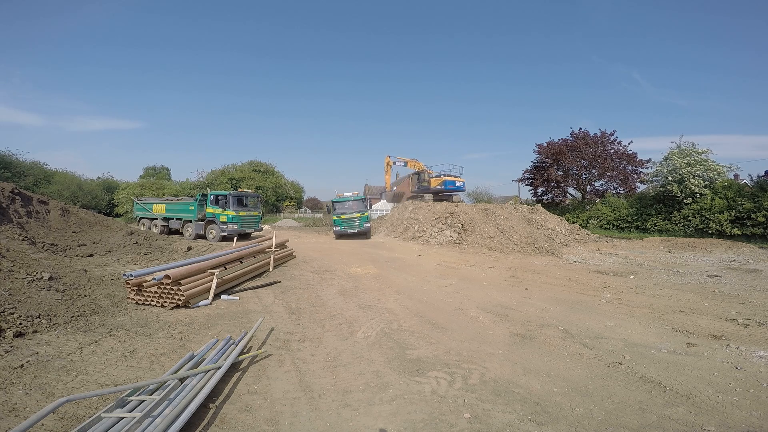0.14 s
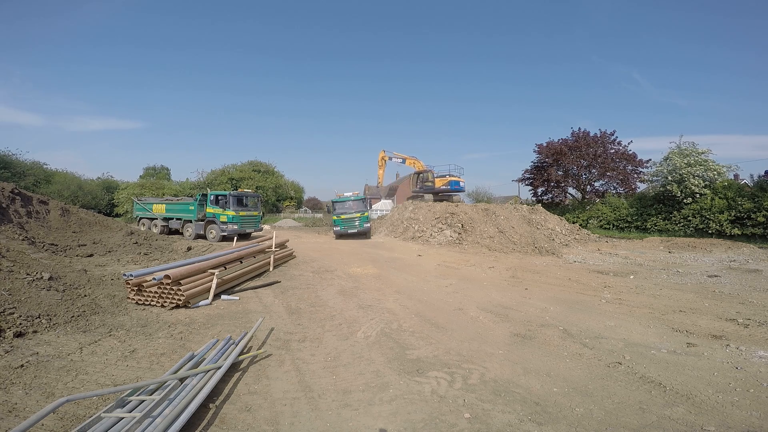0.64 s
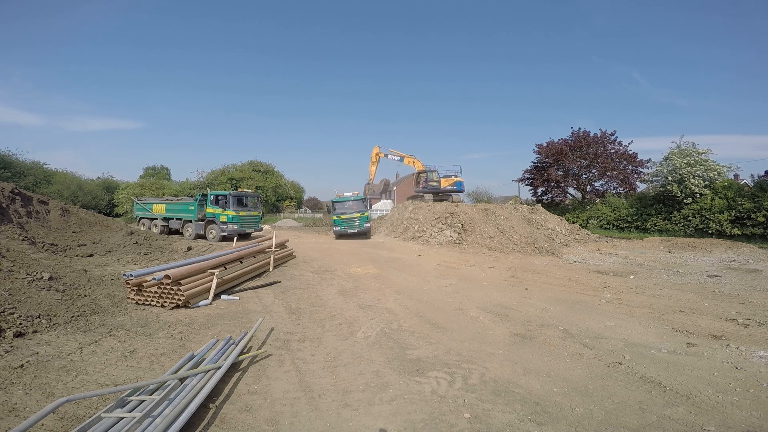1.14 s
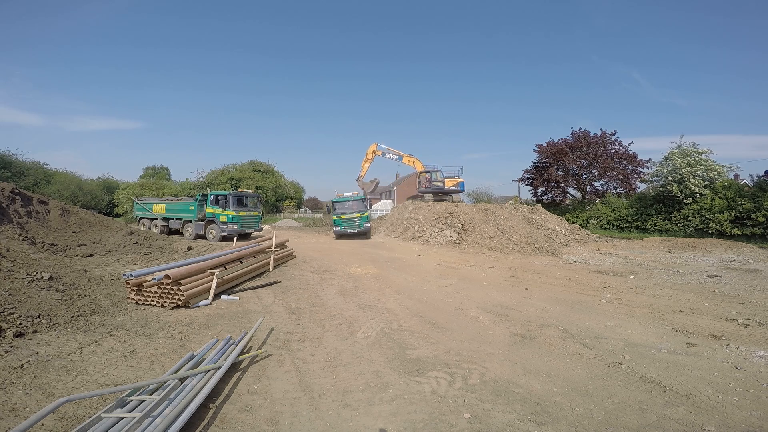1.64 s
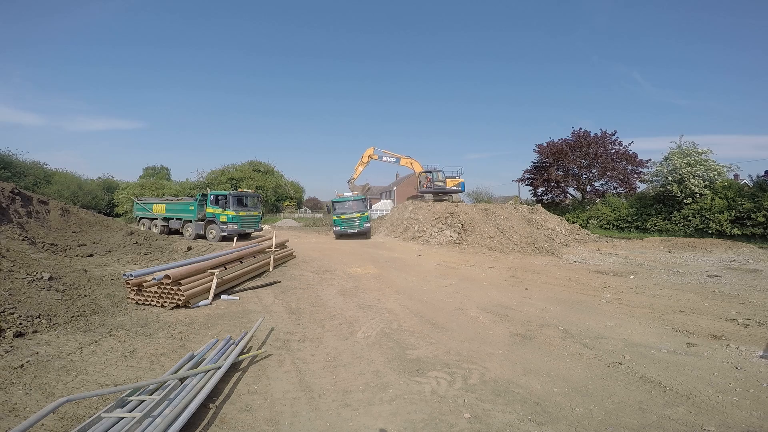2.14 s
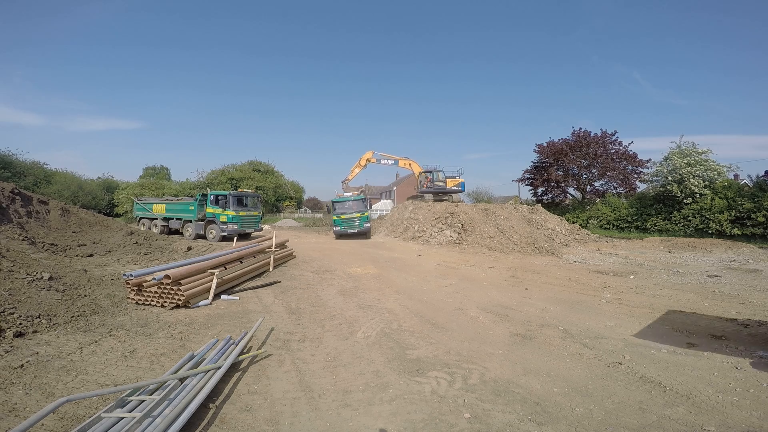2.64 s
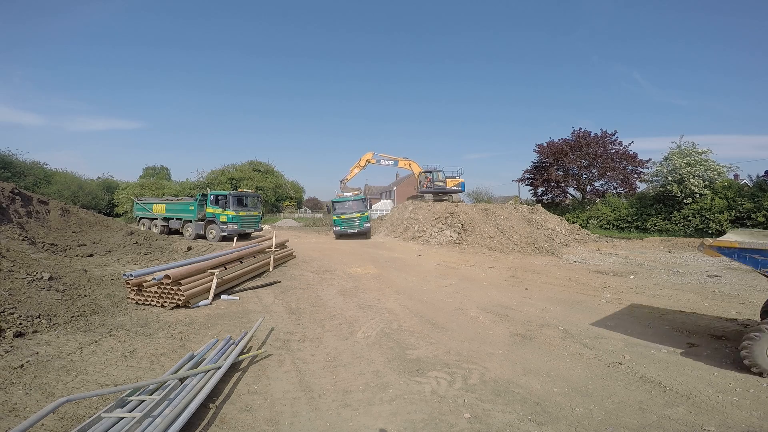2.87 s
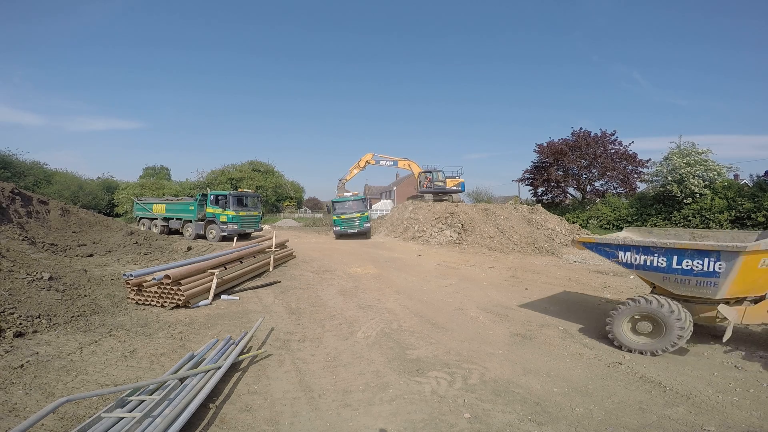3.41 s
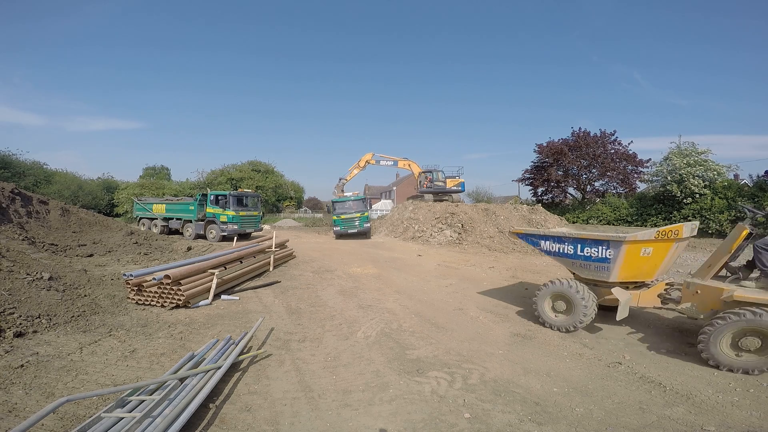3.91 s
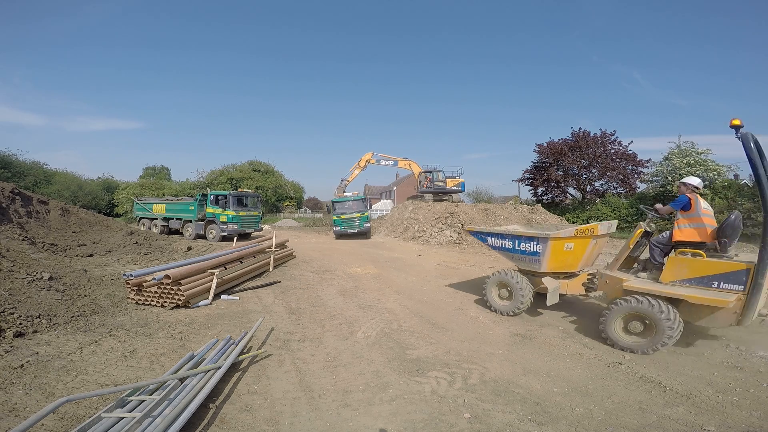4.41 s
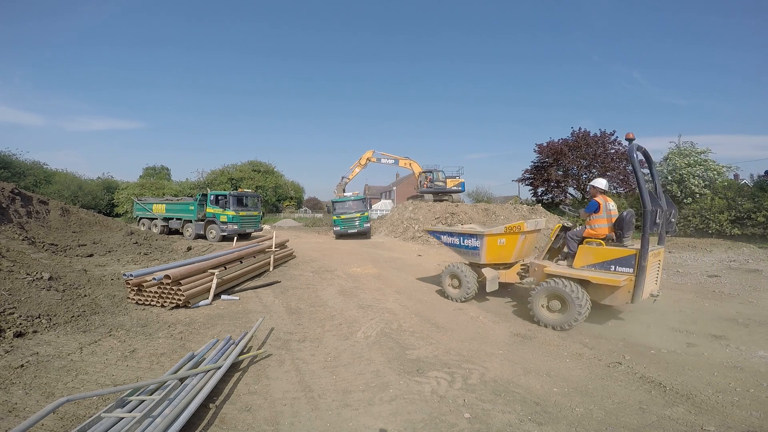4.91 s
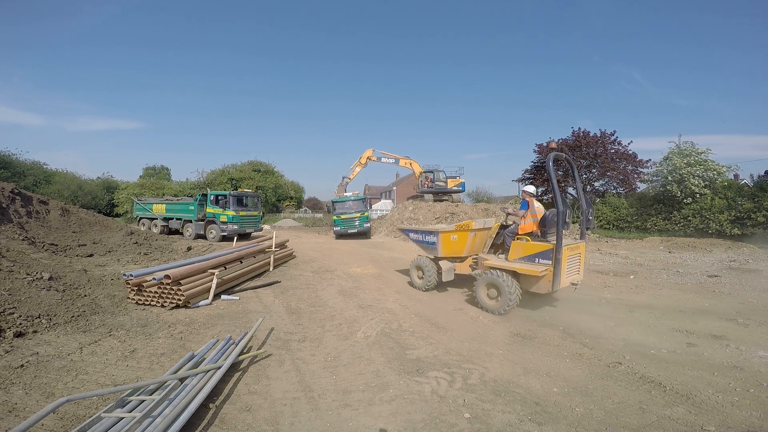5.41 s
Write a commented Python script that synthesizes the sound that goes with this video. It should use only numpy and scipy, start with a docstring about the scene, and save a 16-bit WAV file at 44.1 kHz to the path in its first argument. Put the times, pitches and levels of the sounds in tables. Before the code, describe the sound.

Close diesel engine hums and roars on an earthworks site, skip rattling over ruts, then knocks harder in short throttle bursts as it drives off.

```python
"""An earthworks site: a small diesel dumper drives past a camera microphone in a closed housing.
Close by, two exhaust tones follow the firing rate and noise roars, breaking into diesel knock under load.
The skip clanks over ruts as short noise rattles that ring its modes; thin hiss bands flutter as squeaks.
Far off, coloured noise, unsteady low tones and a sagging sine make a wash, idling machines and a pump.
The housing colours it all with fixed resonances and adds thin electrical tones."""
import sys
import numpy as np
from scipy import signal
from scipy.fft import rfft, irfft, next_fast_len
from scipy.io import wavfile
from scipy.ndimage import uniform_filter1d

SR = 44100
rng = np.random.default_rng(int(sys.argv[2]) if len(sys.argv) > 2 else 0)


def gain_from_db(level_db):
    """Convert decibel levels to linear amplitude factors (20 dB per decade)."""
    decades = np.asarray(level_db, float) / 20
    return 10 ** decades


def waveform_to_disk(signal):
    """Save audio, clipped to [-1, 1], as 16-bit WAV at the path in sys.argv[1]."""
    frames = np.transpose(np.atleast_2d(signal))
    scaled = np.clip(frames, -1, 1) * 32767
    samples = np.round(scaled).astype(np.int16)
    wavfile.write(sys.argv[1], SR, samples)


N = 243873

# engine speed: time_s, firing_rate_hz
SPEED = [(0.0, 74), (0.08, 73.26), (0.55, 72.7), (0.71, 68.42), (1.79, 67.4), (2.15, 59.08), (2.51, 65.56),
         (2.66, 63.5), (2.79, 58.9), (3.2, 59.5), (3.42, 55.11), (3.88, 48.71), (4.07, 44.56), (4.3, 50.46),
         (4.5, 52.45), (4.79, 52.9), (4.91, 50.9), (5.53, 52.6)]
# the drive past: time_s, coasting_tone_db, roar_db (before its trim and surges),
# steady_load (0-1, share of the roar that comes as knocks), tilt_db_per_octave
DRIVE_PAST = [(0, -37.5, -54, 0.02, 0), (.5, -38, -52.5, 0.03, 0), (1.2, -41, -54.5, 0.06, -2),
              (1.6, -36.5, -52, 0.03, -1.5), (2, -35.5, -53, 0, -0.5), (2.34, -33, -51, 0.26, -3.5),
              (3.1, -31.5, -53, 0.03, -2), (3.4, -36, -54, 0.45, -3), (4.05, -36.5, -53.5, 0.29, -2.5),
              (4.4, -34.5, -49.5, .35, -2), (5, -34, -52, 0.23, -.5), (5.53, -33.5, -50.5, 0.19, -1.5)]
# the throttle opens: start_s, length_s, octave_start_db, octave_end_db, firing_tone_sink_db
PULLS = [(-.1, 0.64, -50, -48.5, 11.5), (0.64, 1.11, -50.5, -47.5, 8), (2.118, 0.064, -48, -48, 4),
         (2.28, 0.37, -47.5, -43.5, 9), (2.75, .12, -48, -49, 4.5), (2.94, 0.3, -59.5, -37, 3.5),
         (4.0, 0.31, -40.5, -33.5, 3.5), (4.328, .19, -38, -36.5, 8.5), (4.599, 0.21, -41.5, -37, 9),
         (4.945, 0.091, -42, -46, 9), (5.118, 0.47, -41.5, -37, 5.5)]
# the firing tone swells or drops out briefly: centre_s, half_width_s, change_db
WOBBLES = [(2.17, .03, 3), (2.23, 0.026, -20), (3.0, 0.03, -0.5), (3.18, 0.026, 7.5), (3.22, 0.02, -22),
           (3.94, 0.039, 7.5), (4.03, 0.056, -4.5), (5.28, 0.034, -8)]
# the wheels dig in: centre_s, half_width_s, added_load (0-1), added_cover_buzz_db
SURGES = [(3.75, 0.17, 0, -3), (4.27, 0.092, 0.38, -0.5), (4.5, 0.046, 0.23, 2), (4.77, 0.055, 0.21, 6),
          (5.26, 0.043, 0.32, 6.5), (5.43, 0.14, 0.25, 2.5), (5.53, .05, 0.02, 0)]
# weak upper tones locked to the firing rate (exhaust orders, and a gear or fan line at 4.2):
# multiple_of_firing_rate, level_db (over the rasp)
UPPER_ORDERS = [(3, 1), (4, -5), (4.2, -4.5), (5, -14), (6, -5.5), (7, -7)]
# some clear firings: time_s
KNOCK_TIMES = [4.246, 4.52, 4.771, 4.934, 5.244, 5.415, 5.512]
# tone colour of the roar: frequency_hz, level_db
ROAR_COLOUR = [(300, -0.5), (800, -2.5), (1500, -3), (2500, -3.5), (4000, -5), (7000, -12.5),
               (10000, -21.5), (15500, -25)]
# engine block rings under full load: centre_hz, width_hz, gain_db
BLOCK = [(5620, 580, 17), (7290, 480, 16)]
# engine cover buzz: centre_hz, width_hz, share (of the buzz in dB)
COVER = [(1800, 182, 1), (2250, 280, 1)]
# skip and chassis clanks: start_s, level_db (before trim), rattle_length_s, centre_hz, skip_ring_db
CLANKS = [(1.585, -20.5, 0.011, 1400, -18), (2.144, -21.5, 0.037, 2550, -2.5),
          (2.176, -26, 0.078, 1800, -11), (2.237, -18.5, 0.047, 2250, -9.5), (2.255, -23, 0.014, 1000, 8.5),
          (2.383, -27.5, 0.022, 4770, -22), (2.416, -18.5, 0.022, 1380, -11), (2.438, -22, .014, 2480, -26),
          (2.477, -25, 0.026, 2420, -7), (2.591, -24, 0.054, 1380, -20), (2.735, -29, 0.024, 2500, -17),
          (2.83, -24.5, 0.057, 5040, -30), (2.855, -48, 0.0081, 4460, -18), (2.904, -23, 0.023, 1360, -24),
          (3.149, -28.5, 0.059, 2420, -31), (3.191, -28.5, 0.09, 1990, -4), (3.246, -28, 0.031, 5100, -16),
          (3.362, -33, 0.035, 5830, -27), (3.88, -27, 0.037, 4450, -8.5)]
# ringing modes of the skip: pitch_hz, level_db (relative), t60_s
SKIP = [(153, 9, 0.053), (203, 0, 0.056), (291, 0.5, 0.059), (328, -1.5, 0.085), (500, 3.5, 0.046),
        (710, -5, 0.041), (947, 3.5, 0.032)]
# thin high squeaks: start_s, length_s, pitch_hz, width_hz, level_db
SQUEAKS = [(-.1, 0.26, 8300, 600, -70), (0.14, 0.26, 8270, 600, -70), (0.19, .22, 9400, 600, -78),
           (1.58, 0.25, 2520, 50, -68.5), (0.495, 0.38, 8270, 600, -72), (3.44, .08, 11100, 600, -74),
           (3.6, 0.12, 11000, 500, -79), (4.62, .07, 11400, 400, -75), (4.97, 0.053, 8200, 300, -67)]
# colour of the distant wash: frequency_hz, level_db (per Hz, relative)
SITE_COLOUR = [(12, -32), (20, 13), (70, -4), (243, -18), (1220, -21), (1400, -18), (1560, -40.5),
               (2510, -33), (3600, -32), (4130, -31.5), (5930, -40), (12900, -43), (15200, -55)]
# far idling tones: pitch_hz, unsteadiness_hz, level_db (relative)
IDLING = [(36, 4, 0), (51, 5, -1), (92, 2, -11)]
# far idling swells or sags: centre_s, half_width_s, change_db
REVS = [(1.45, 0.33, 5.5), (2.4, 0.57, 8), (4.39, 0.22, -9), (4.97, .15, 10.5), (5.55, .1, 2)]
# the pump whine swells or fades: centre_s, half_width_s, change_db
WHINE_CHANGES = [(2, 0.32, -2.5), (3.0, 0.36, 3.5), (3.7, 0.25, -14), (4.2, 0.28, -5), (5.5, 0.87, -8)]
# resonances and notches of the housing: centre_hz, width_hz, gain_db
HOUSING = [(1077, 105, 4.5), (1216, 104, -6), (1412, 48, 6.5), (1603, 102, -13.5), (1693, 300, 4.5),
           (2080, 55, -15), (2470, 180, 8), (3446, 160, 4.5), (3567, 145, -17), (4135, 493, 12),
           (5390, 190, 4.5), (6270, 92, 3), (7300, 500, 0), (8160, 150, 2)]
# electrical tones: pitch_hz, level_db
ELECTRICAL = [(6293.7, -78), (6323.7, -75), (12617.4, -81)]

OPEN_S, SHUT_S = 0.07, 0.11  # throttle opening and closing ramps
SHUT_OCTAVE_DB = -21.5  # octave under the firing tone with the throttle shut
RASP_DB, RASP_LOAD_DB = -65.5, 14  # upper orders: level unloaded, gain at full load
KNOCK_RISE_S, KNOCK_DECAY_S = 0.0018, 0.006
TICK_DECAY_S, TICK_DB = 0.002, -3  # the sharp treble tick that starts each knock
SURGE_DB = 8  # gain of the roar at full added load
ROAR_TRIM_DB, CLANK_TRIM_DB = 6.5, -13.5  # added to the levels in the tables
COVER_DB, TURN_S, TURN_LENGTH_S = 7.5, 3.02, 1  # buzz heard once the engine side turns to the camera
WASH_DB, IDLE_DB, WHINE_DB = -47, -49, -59.5
WHINE_HZ, WHINE_SAG_HZ_PER_S2 = 524.4, 0.25


def evened(x):
    """Scales x to rms 1."""
    return x / np.sqrt(np.mean(x ** 2) + 1e-20)


def curves(rows):
    """Joins the rows of a timed table with straight lines, one curve a column."""
    s, *columns = np.transpose(rows)
    return [np.interp(np.arange(N) / SR, s, c) for c in columns]


def bumps(rows, order=2):
    """Sum of bell-shaped swells in time, their heights in column order."""
    t = np.arange(N) / SR
    return sum(row[order] * np.exp(-((t - row[0]) / row[1]) ** 2) for row in rows)


def read(points, hz):
    """Reads a colour table on a log frequency axis."""
    f, value = np.transpose(points)
    return np.interp(np.log(hz + 1), np.log(f + 1), value)


def bells_db(modes, hz):
    """Resonant peaks and notches, summed in dB."""
    return sum(db / (1 + (2 * (hz - f) / width) ** 2) for f, width, db in modes)


def wander(hz):
    """Slow chance of rms 1, up to hz."""
    size = next_fast_len(N, True)
    low_pass = 1 + (np.fft.rfftfreq(size, 1 / SR) / hz) ** 4
    return evened(irfft(rfft(rng.standard_normal(size)) / low_pass, size)[:N])


def shaped(x, field_db, size=512):
    """Colours x by a dB field, a function of frequency (column) and sample index (row)."""
    overlap = size * 3 // 4
    hz, t, z = signal.stft(x, SR, nperseg=size, noverlap=overlap)
    at = np.minimum((t * SR).astype(int), len(x) - 1)
    coloured = z * gain_from_db(field_db(hz[:, None], at))
    return signal.istft(coloured, SR, nperseg=size, noverlap=overlap)[1][:len(x)]


def firing_turns():
    """Counts firings along the engine speed, whole at each clear knock."""
    turns = np.cumsum(curves(SPEED)[0]) / SR
    at = np.multiply(KNOCK_TIMES, SR)
    excess = np.unwrap(turns[at.astype(int)] % 1, period=1)
    return turns - np.interp(np.arange(N), at, excess)


def throttle():
    """Level of the firing tone in dB and gain of its octave: opening sinks one and sounds the other."""
    t, first_db = np.arange(N) / SR, curves(DRIVE_PAST)[0]
    octave = gain_from_db(first_db + SHUT_OCTAVE_DB)
    for s, length, start_db, end_db, sink_db in PULLS:
        opening = np.clip((t - s) / OPEN_S, 0, 1)
        closing = np.clip(1 + (s + length - t) / SHUT_S, 0, 1)
        opened = opening * closing
        first_db = first_db - sink_db * opened
        octave = octave + opened * gain_from_db(np.interp(t, [s, s + length], [start_db, end_db]))
    return first_db + bumps(WOBBLES), octave


def exhaust(turns):
    """Clean tones on the firing rate and its octave; the weak upper orders come and go."""
    first_db, octave = throttle()
    rasp_db = RASP_DB + RASP_LOAD_DB * (curves(DRIVE_PAST)[2] + bumps(SURGES))
    out = gain_from_db(first_db) * np.cos(2 * np.pi * (turns + 0.031))
    out = out + octave * np.cos(4 * np.pi * (turns + 0.18))
    for order, db in UPPER_ORDERS:
        level = gain_from_db(db + rasp_db + 2.4 * wander(5.2))
        phase = order * turns + rng.random() + 0.084 * wander(4.1)
        out = out + level * np.cos(2 * np.pi * phase)
    return np.sqrt(2) * out


def diesel_knock(turns, load):
    """Noise bursts at each firing, of uneven strength and growing with load, each begun by a treble tick."""
    strength = gain_from_db(1.6 * rng.standard_normal(1000))[np.floor(turns).astype(int) % 1000]
    since_s = turns % 1 / curves(SPEED)[0]
    rise = 1 - np.exp(-since_s / KNOCK_RISE_S)
    knock = evened(strength * rise * np.exp(-since_s / KNOCK_DECAY_S))

    def brightness_db(hz, at):
        return 2.7 * np.log2(hz / 3000 + 0.076)

    knocks = shaped(np.sqrt(load) * knock * rng.standard_normal(N), brightness_db, size=128)
    tick_noise = strength * np.exp(-since_s / TICK_DECAY_S) * rng.standard_normal(N)
    tick = evened(np.diff(tick_noise, prepend=0))  # the difference favours the treble
    return knocks + gain_from_db(TICK_DB) * load * tick


def roar(turns):
    """Block noise gives way to knock as the engine is loaded; many small panels ring in it."""
    _, level_db, load, tilt_db = curves(DRIVE_PAST)
    surge = bumps(SURGES)
    load, level_db = np.clip(load + surge, 0, 1), level_db + SURGE_DB * surge
    facing = np.clip((np.arange(N) / SR - TURN_S) / TURN_LENGTH_S, 0, 1)
    cover_db = facing * (COVER_DB + bumps(SURGES, order=3))
    steady = np.sqrt(1 - load) * rng.standard_normal(N)
    drive = (steady + diesel_knock(turns, load)) * gain_from_db(0.55 * wander(4.0))
    # random peaks and dips over frequency that drift slowly in time
    panels = uniform_filter1d(rng.standard_normal((513, N // 256 + 9)), 40, 1)
    panels = evened(uniform_filter1d(panels, size=2, axis=0))

    def colour_db(hz, at):
        tilted = read(ROAR_COLOUR, hz) + tilt_db[at] * np.log2(hz / 2300 + 0.0097)
        return tilted + load[at] * bells_db(BLOCK, hz) + cover_db[at] * bells_db(COVER, hz)

    def panels_db(hz, at):
        return 2.74 * panels[:, :len(at)]

    coloured = shaped(drive, colour_db, size=256)
    return gain_from_db(level_db + ROAR_TRIM_DB) * shaped(coloured, panels_db, size=1024)


def clanks():
    """Each jolt is a short rattle of loose steel that also rings the skip."""
    t, out = np.arange(SR // 4) / SR, np.zeros(N + SR)
    ring = sum(gain_from_db(db - 60 * t / t60) * np.sin(2 * np.pi * hz * t) for hz, db, t60 in SKIP)
    ring = ring / np.linalg.norm(ring)
    for s, db, length, centre_hz, ring_db in CLANKS:
        envelope = (1 - np.exp(-t / 0.0039)) * np.exp(-(t / length) ** 2)
        shaking = rng.standard_normal(len(t)) * envelope

        def steel_db(hz, at):
            skirts = 5 * np.abs(np.log2((hz + 40) / centre_hz)) ** 0.78
            treble_loss = 12 * np.log2(1 + (hz / 7000) ** 2)
            return bells_db([(centre_hz, 300, 6)], hz) - skirts - treble_loss

        rattle = shaped(shaking, steel_db, size=256)
        rung = gain_from_db(ring_db) * signal.fftconvolve(shaking, ring)[:len(t)]
        start = round(s * SR)
        out[start:start + len(t)] += gain_from_db(db + CLANK_TRIM_DB) * (rattle + rung)
    return out[:N]


def squeaks():
    """Narrow fluttering hiss, as from a belt or dry pins."""
    out, t = np.zeros(N), np.arange(N) / SR
    for s, length, hz, width, db in SQUEAKS:
        swell = np.sin(np.pi * np.clip((t - s) / length, 0, 1))
        hiss = wander(width / 2) * np.cos(2 * np.pi * hz * t)
        hiss = hiss + wander(width / 2) * np.sin(2 * np.pi * hz * t)
        out += gain_from_db(db) * swell * hiss
    return out * gain_from_db(2.7 * wander(16))


def far_idling():
    """Distant engines: low tones, lumpy as their level and phase wander."""
    t, idle = np.arange(N) / SR, np.zeros(N)
    for hz, unsteady_hz, db in IDLING:
        level = gain_from_db(db + 3.0 * wander(unsteady_hz))
        idle += level * np.cos(2 * np.pi * hz * t + 1.33 * wander(unsteady_hz))
    return gain_from_db(IDLE_DB + bumps(REVS)) * evened(idle)


def pump_whine():
    """A far pump, slowing: a sine of sagging pitch with unsteady level and phase."""
    t = np.arange(N) / SR
    hz = WHINE_HZ - WHINE_SAG_HZ_PER_S2 * t ** 2
    level = gain_from_db(WHINE_DB + bumps(WHINE_CHANGES) + 1.8 * wander(5))
    return level * np.sqrt(2) * np.sin(2 * np.pi * np.cumsum(hz) / SR + 0.4 * wander(5))


def site_wash():
    """Distant machinery and air: coloured noise, patchy in time and frequency."""
    patches = uniform_filter1d(rng.standard_normal((1025, N // 512 + 9)), 6, 0)
    patches = evened(uniform_filter1d(patches, 10, 1))

    def colour_db(hz, at):
        return read(SITE_COLOUR, hz) + 2.4 * patches[:, :len(at)]

    return gain_from_db(WASH_DB) * evened(shaped(rng.standard_normal(N), colour_db, size=2048))


def scene():
    """The dumper close by, over the far machines and the wash of the site; one channel."""
    turns = firing_turns()
    dumper = exhaust(turns) + roar(turns) + clanks() + squeaks()
    return (dumper + far_idling() + pump_whine() + site_wash())[None]


def band_limit(x):
    """A steep low-pass at the top of the band."""
    return signal.sosfilt(signal.butter(12, 15400, fs=SR, output="sos"), x)


def record(dry):
    """The closed housing resonates around the microphone, lows are cut and thin electrical tones join."""
    hz, t = np.fft.rfftfreq(N, 1 / SR), np.arange(N) / SR
    low_cut_db = -20 * np.log10(1 + (24 / (hz + 1)) ** 2)
    housed = irfft(rfft(dry) * gain_from_db(bells_db(HOUSING, hz) + low_cut_db), N)
    tones = sum(gain_from_db(db) * np.sqrt(2) * np.sin(2 * np.pi * f * t) for f, db in ELECTRICAL)
    return band_limit(housed + tones)


dry = scene()
out = record(dry)
waveform_to_disk(out)
```